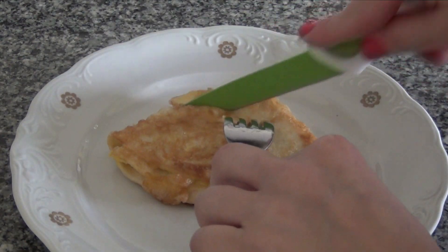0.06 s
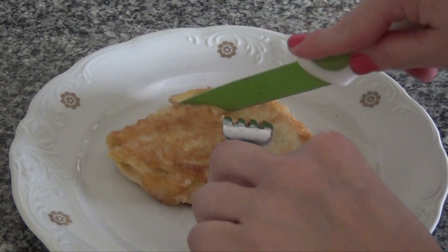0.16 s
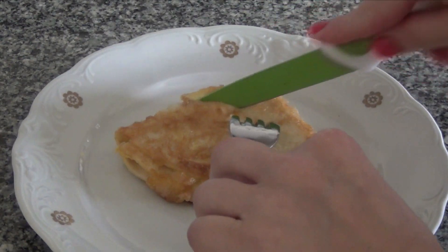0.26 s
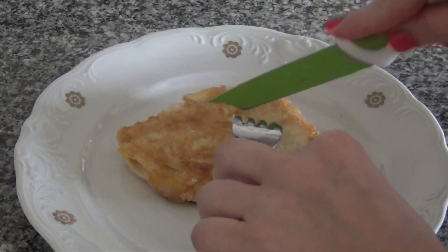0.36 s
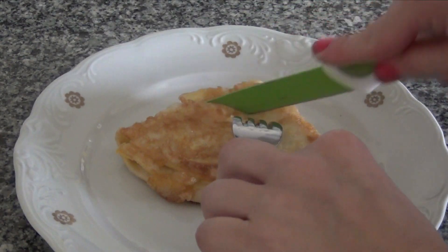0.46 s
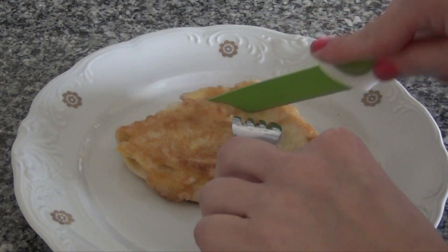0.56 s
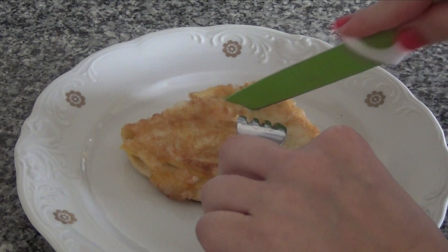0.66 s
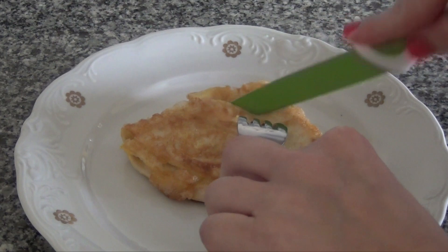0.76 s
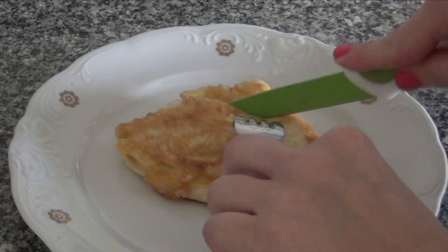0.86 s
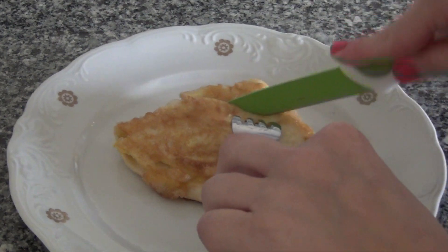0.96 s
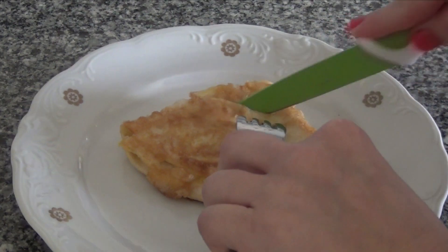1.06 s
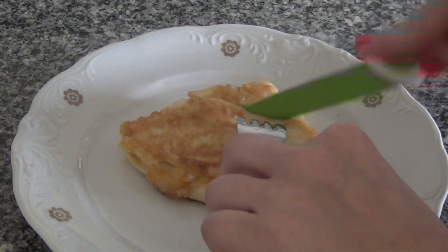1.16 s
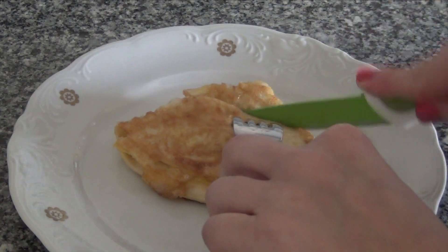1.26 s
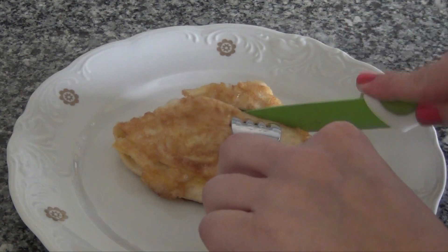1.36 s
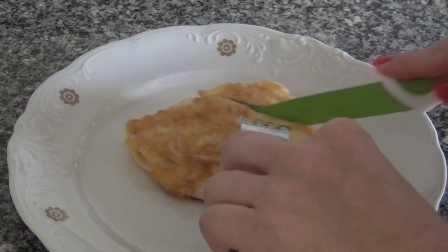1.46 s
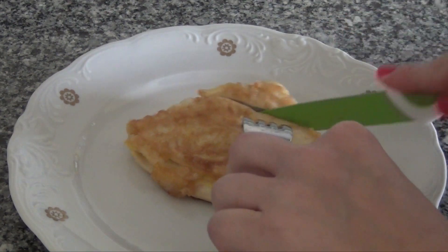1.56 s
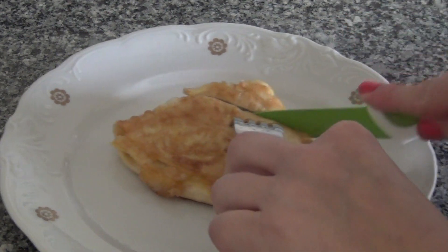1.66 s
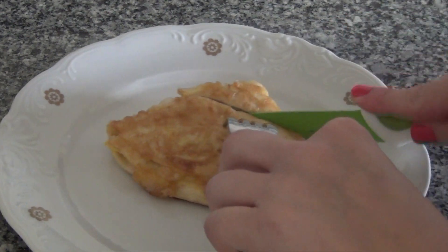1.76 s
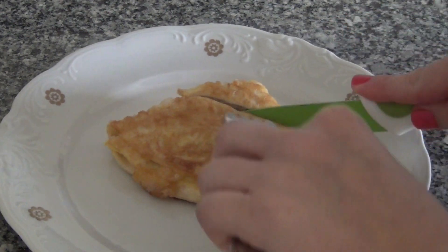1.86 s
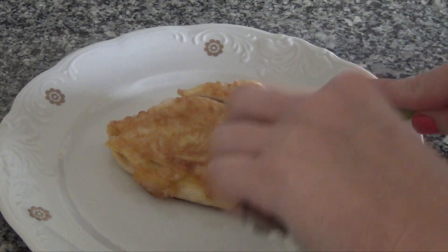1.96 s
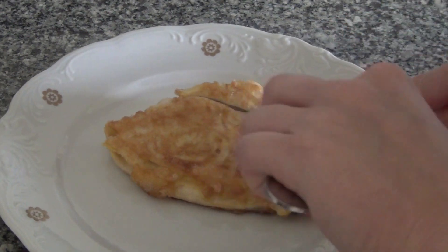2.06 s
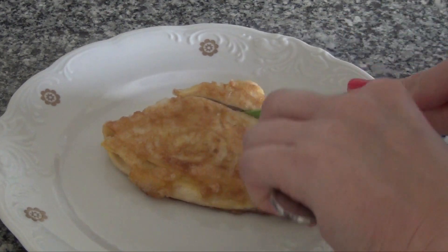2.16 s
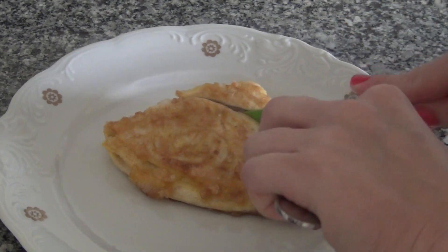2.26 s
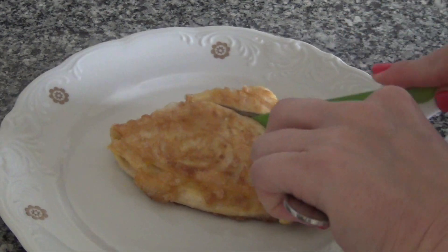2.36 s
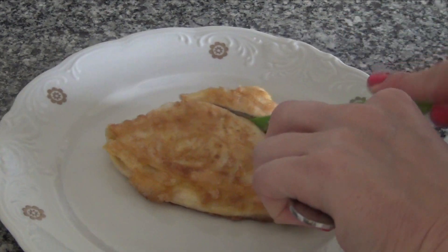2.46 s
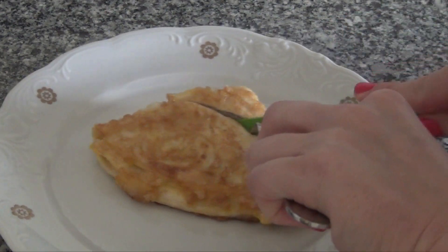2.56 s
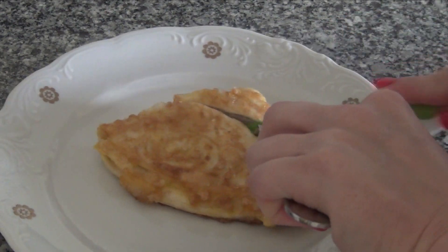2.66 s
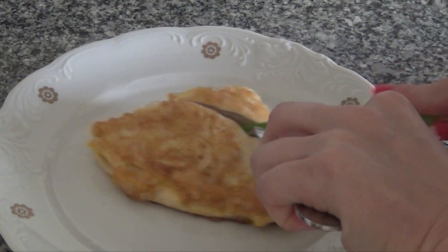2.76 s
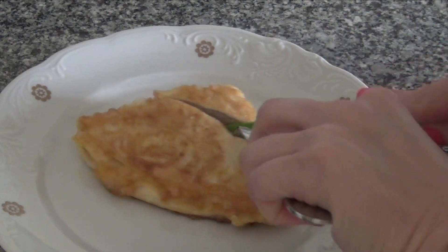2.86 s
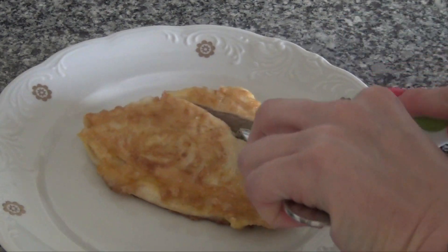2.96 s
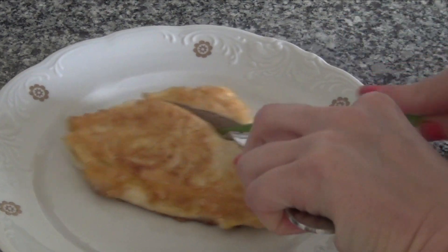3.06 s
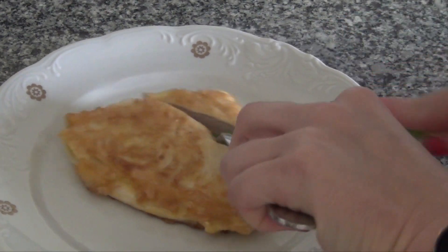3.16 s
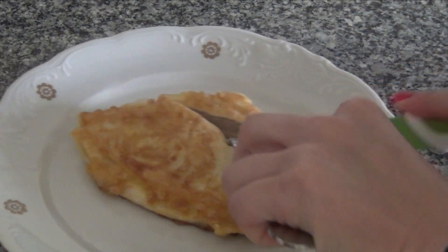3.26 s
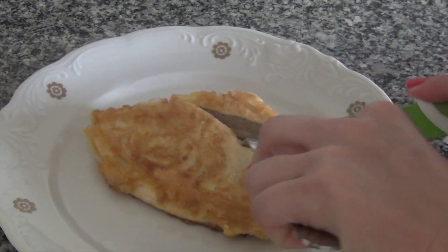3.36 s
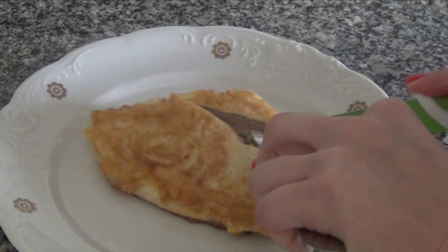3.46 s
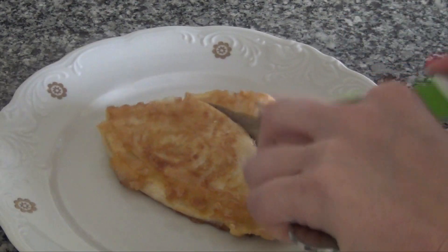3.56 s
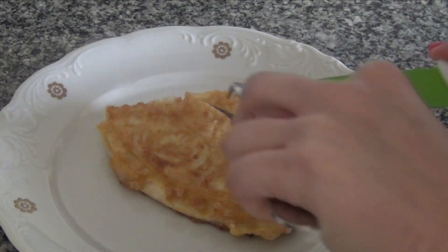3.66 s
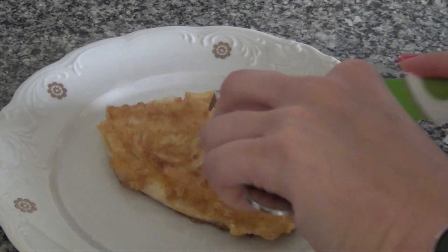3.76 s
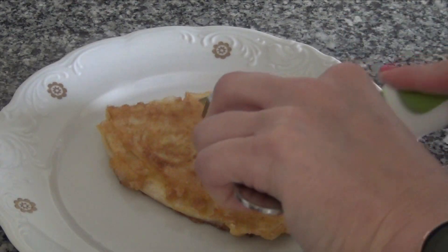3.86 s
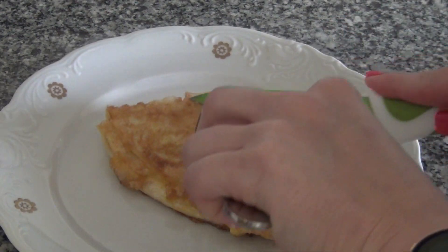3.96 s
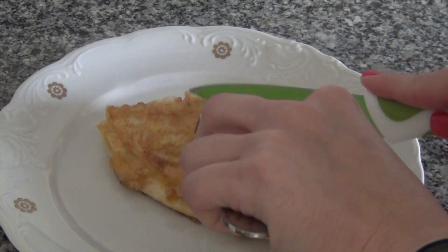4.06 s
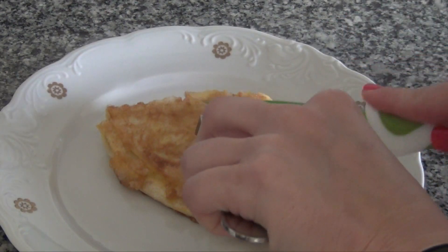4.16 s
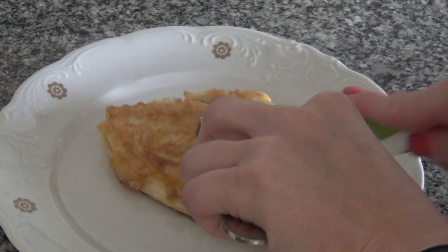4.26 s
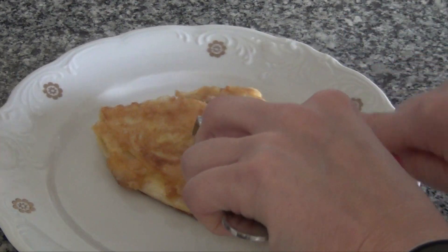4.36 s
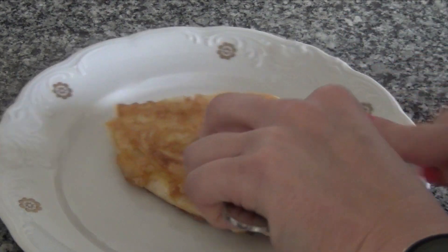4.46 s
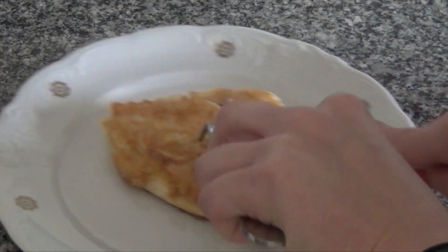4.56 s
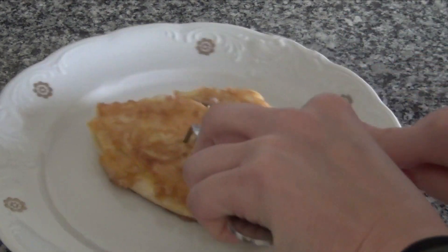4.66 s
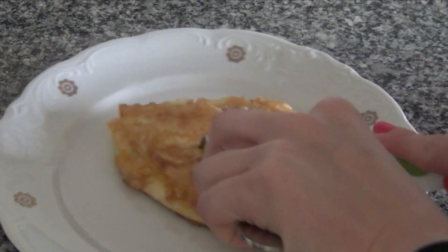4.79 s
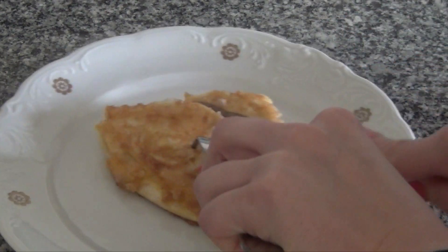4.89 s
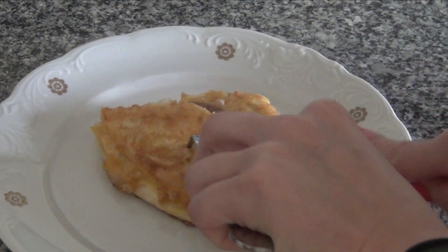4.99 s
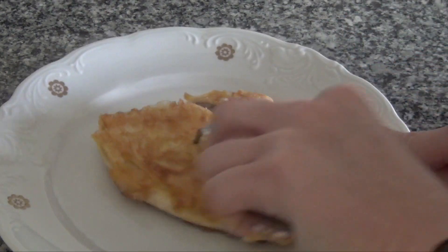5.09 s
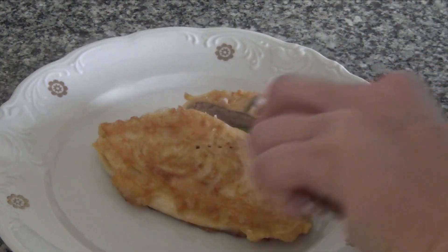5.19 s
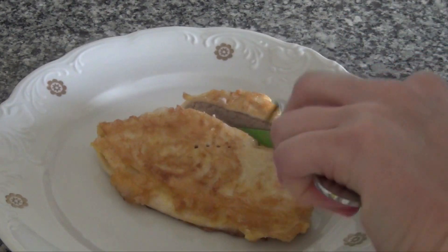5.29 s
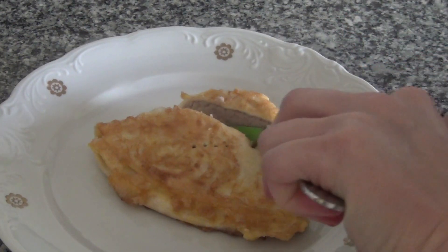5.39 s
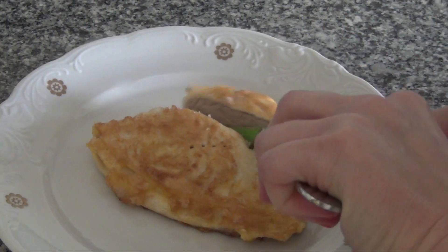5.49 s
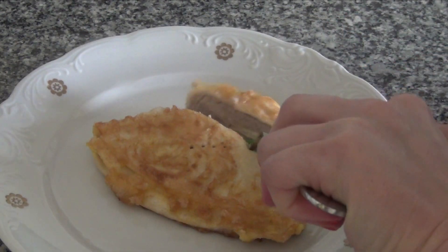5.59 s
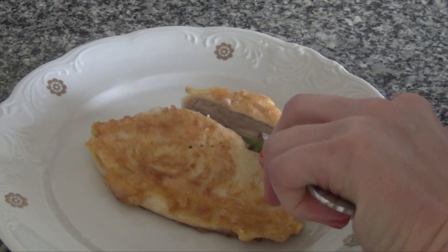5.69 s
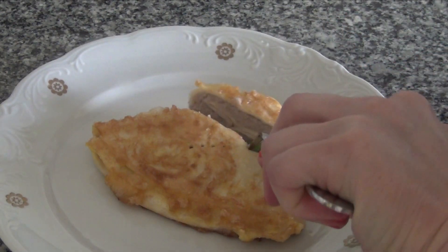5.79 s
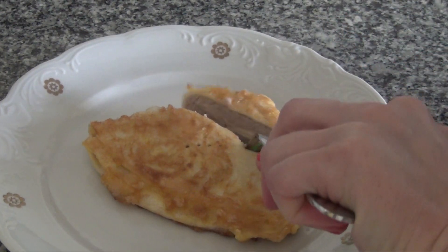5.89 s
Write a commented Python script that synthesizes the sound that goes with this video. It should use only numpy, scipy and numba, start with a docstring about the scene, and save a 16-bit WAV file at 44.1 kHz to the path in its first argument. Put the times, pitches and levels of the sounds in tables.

```python
"""Cutting fried food on a plate

A knife saws through fried food on a porcelain plate, held by a fork, close to a small camera.
Blows and scrapes ring the plate's modes (its own pitches); it also chatters and booms on a stone worktop.
The crust cracks in short noise clicks; delay lines make a hard kitchen ring after it.
Shaped noise, wavering hum and two steady tones lie underneath."""
import sys
import numpy as np
from scipy import signal
from scipy.fft import rfft, irfft
from scipy.io import wavfile
from scipy.ndimage import uniform_filter1d
from numba import njit

SR = 44100
rng = np.random.default_rng(int(sys.argv[2]) if len(sys.argv) > 2 else 0)


def to_wav(sig):
    """Store sig (one row per channel, or 1-D mono) as 16-bit WAV at the path in sys.argv[1].

    Samples outside -1..1 are clipped; the rate is SR.
    """
    pcm = np.clip(np.atleast_2d(sig), -1, 1) * 32767
    pcm = np.round(pcm).astype(np.int16)
    wavfile.write(sys.argv[1], SR, pcm.T)  # frames by channels


N = 261634  # length in samples

# shape of the kitchen noise: (frequency [Hz], relative level per Hz [dB])
KITCHEN_SPECTRUM = [(28, -60), (42, -39), (75, -30), (130, -17.5), (180, -10), (330, -12.5), (480, -12),
                    (530, -12.5), (850, -9), (1400, -16.5), (3500, -21), (6000, -25.5), (11000, -26.5),
                    (15700, -27)]
# wavering hum of an appliance: (frequency [Hz], width [Hz], rms level [dB])
HUM_LINES = [(223.3, 4, -60.5), (432.4, 31, -60), (453, 23, -56)]
# steady mains hum and an electronic whine: (frequency [Hz], rms level [dB])
STEADY_TONES = [(100, -68.5), (15625, -75)]
KITCHEN_NOISE_DB, KITCHEN_TOP_HZ = -53, 15750

# cutlery dragging over the glaze, one row a push, levels before each group's own share:
# (strongest moment [s], length [s], low and body level [dB], treble level [dB])
SCRAPE_PUSHES = [(0.089, 0.055, -40, -43.5), (0.45, 0.071, -42, -48), (0.652, 0.088, -49.5, -55),
                 (1.054, 0.069, -42.5, -52), (1.305, .03, -42, -53), (1.362, .08, -37, -70),
                 (1.49, 0.16, -53.5, -61.5), (1.68, 0.065, -35, -48.5), (1.77, 0.03, -44, -64),
                 (1.837, 0.089, -40, -60), (2.15, 0.068, -51, -54.5), (2.298, 0.026, -52, -56),
                 (2.366, 0.096, -49.5, -55.5), (2.507, 0.036, -49.5, -59), (2.572, 0.1, -45, -53.5),
                 (2.68, 0.041, -45, -41.5), (2.82, 0.31, -43.5, -52.5), (2.962, 0.083, -39, -41.5),
                 (3.079, 0.089, -34, -43), (3.218, 0.092, -36, -41.5), (3.328, 0.13, -40, -50.5),
                 (4.035, 0.031, -61, -53), (4.175, 0.028, -73, -64), (4.35, 0.052, -60, -57.5),
                 (4.5, 0.11, -40, -48), (4.617, 0.098, -40, -40.5), (4.766, 0.17, -43.5, -46),
                 (5.044, 0.028, -34, -34.5), (5.125, 0.056, -38, -53), (5.48, 0.19, -51, -55),
                 (5.584, 0.072, -46.5, -50), (5.651, 0.022, -58, -50), (5.787, 0.078, -37, -38),
                 (5.894, 0.057, -48, -56)]
# how a scrape's treble is shared out: group name -> level [dB]
SCRAPE_TREBLE_DB = dict(ping=-1.5, clink=-0.5, sheen=-3.5)
# a push swells by this much to its strongest moment; share of its length spent rising
SWELL_DB, RISE_SHARE = 10, 0.49
GRIT_DB = -7  # share of the grit heard as plain rasp

# blows on the plate, the last three relative to the body:
# (time [s], body level [dB], low modes [dB], ping modes [dB], brightness [dB])
PLATE_BLOWS = [(0.0547, -18.5, -3, -14.5, -15), (0.0656, -17.5, -13.5, -17, -16),
               (0.1239, -13.5, -12, -1, -7), (0.42, -24, -5, -37, -24), (0.4484, -29, 0, -23, -16),
               (0.478, -14, -13, -0.5, -3.5), (0.7976, -22.5, -7.5, -18, -22),
               (0.827, -14.5, -10.5, -13, -16.5), (0.8427, -14.5, -7, -16, -13),
               (0.8515, -8, -30, -9.5, -11.5), (0.8634, -20, -9.5, -14, -18), (0.8984, -22.5, -10, -9, -27),
               (1.1838, -18.5, -7.5, -24, -22.5), (1.2129, -13, -20, -18, -20),
               (1.2301, -9.5, -12.5, -13.5, -14), (1.2437, -20, 3, -27, -13), (1.2548, -18, -7, -13, -20),
               (1.5923, -39.5, -6, 2, 4), (1.5999, -31.5, -24, -3, 2), (1.6161, -17, -16.5, -5, -5.5),
               (1.6371, -23.5, -5.5, -32, -23), (1.6671, -27.5, -2, -23, -18), (1.7538, -34, -6, -5, 3),
               (1.8094, -21, -2.5, -35, -29), (2.118, -41, -18, -7, 9), (2.2927, -40, -14, -23, -6),
               (2.3368, -38, -12, -10, -9), (2.643, -50, -22, 4, 8), (2.6538, -35, -23, 7.5, 13),
               (2.7684, -33, -22, -8, -10), (3.0159, -33.5, -26, -4, 3.5), (3.1937, -27, -39, -10, -23),
               (3.209, -31, -32, -2, -9), (4.0293, -48, -11, 1, 2), (4.363, -10, -19, -17, -15),
               (4.368, -15, -7.5, -11, -12), (4.3794, -9, -17, -20, -16.5),
               (4.3925, -13.5, -8.5, -9.5, -19.5), (4.5455, -20, -8, -21, -16.5),
               (4.5587, -13, -10, -25, -20), (4.572, -11.5, -8, -23.5, -20.5), (4.6527, -26, -7, -35, -14),
               (4.735, -32, -25, -11, -3), (4.7572, -28, -22, -7, -4), (4.8586, -29, -23, -8, 0),
               (4.8677, -13.5, -14, -12, -5), (4.876, -13, -12.5, -14, -19),
               (4.8861, -12.5, -5.5, -27, -27), (5.022, -22, -9.5, -9, -9), (5.0363, -26, -6, -12, -2),
               (5.0576, -11.5, -8, -22, -20), (5.1647, -11.5, -11.5, -30, -17.5),
               (5.1708, -8.5, -11, -16, -18), (5.3419, -33.5, -7.5, 2, 11.5), (5.5504, -36, -7, -11, -13),
               (5.6606, -33, -3.5, 5.5, 5), (5.7786, -33, -32, -15, -1), (5.8875, -35.5, -11, -25, -7.5)]
# how brightness lifts the upper groups: (level at brightness 0 [dB], slope [dB per dB])
BRIGHTNESS_LIFT = dict(clink=(-1.8, 0.82), sheen=(2.25, 1.25))
# plate modes in each group: (frequency [Hz], width [Hz], energy within the group [dB])
PLATE_MODES = dict( low=[(420, 70, -2), (490, 30, -3), (618, 18, 1), (731, 14, 0)], body=[(1148, 18, -8),
               (1343, 25, -2), (1390, 22, -1), (1490, 28, 1), (1585, 70, -2), (1755, 45, -2),
               (1890, 40, -3), (2009, 28, -7), (2357, 4, -15)], ping=[(2925, 50, -1), (3082, 14, -2),
               (3260, 140, -5)], clink=[(3930, 40, -10), (4440, 80, 0), (4880, 80, 0), (5600, 110, -1),
               (5950, 70, -3), (6260, 70, -5)], sheen=[(7200, 60, -5), (7860, 110, -2), (9250, 110, -5),
               (9480, 110, -2), (10800, 220, 0), (11500, 250, -2), (12100, 200, 0), (14100, 200, -6)])
# what each group gives off:
# (low edge [Hz], high edge [Hz], ring [dB], scrape [dB], scrape tilt [dB per octave])
MODE_GROUPS = dict(low=(309, 833, -2.5, -21, -13), body=(1013, 2331, -4, -7.5, 30.5),
               ping=(2515, 3593, -1, -5.5, 29), clink=(3709, 6700, -1.5, -6, -9.5),
               sheen=(6905, 14500, -2.5, -1, 2))
# noise of the blow's contact in each group: (level [dB], decay [s])
CONTACT_NOISE = dict(low=(-15, .015), body=(-14, .009), ping=(-16, .006), clink=(-15, .008),
                 sheen=(-14, .007))
# rattle after each blow, before the scrape share: (level relative to the blow [dB], time to fall 60 dB [s])
CHATTER_TAILS = dict(low=(-10, 0.5), body=(-14, 0.26), ping=(-19.5, 0.38), clink=(-15, 0.24),
                 sheen=(-17, .12))
# soft, late boom of the worktop under the plate
BOOM_HZ, BOOM_WIDTH_HZ, BOOM_DB, BOOM_RISE_S, BOOM_FALL_S = 208, 88, -6.5, 0.015, 0.038

# crust cracking under the blade: (time [s], peak level [dB], centre frequency [Hz])
CRUST_TICKS = [(0.1082, -30, 11500), (0.2126, -31.5, 10900), (0.405, -37, 9700), (0.645, -38, 9100),
               (1.1767, -47, 11300), (1.1935, -31, 9550), (1.3024, -22.5, 10000), (1.4905, -35, 11600),
               (1.6464, -43, 7330), (1.8587, -35, 9100), (2.208, -29.5, 12300), (2.2163, -32, 12700),
               (2.299, -36, 9250), (2.3104, -35, 9790), (2.358, -34, 12400), (2.3694, -35, 10700),
               (2.577, -39, 9580), (2.7114, -33, 7810), (2.7611, -42, 10600), (2.789, -32, 11100),
               (3.4144, -51, 9230), (3.4635, -46, 8100), (3.5624, -34.5, 8100), (3.5706, -31, 11500),
               (4.0347, -30.5, 10600), (4.1684, -35, 10100), (4.251, -40, 12100), (4.305, -34, 11600),
               (4.4725, -31.5, 8530), (4.4842, -35, 12000), (4.705, -37, 11000), (5.0963, -34, 11100),
               (5.143, -32, 9100), (5.1576, -41, 9600), (5.509, -34, 9160), (5.6022, -33, 9210),
               (5.6476, -42, 11400)]

CAMERA_TOP_HZ = 16500


def undb(db):
    """Turn decibels into a gain."""
    return 10 ** (np.asarray(db) / 20)


def level(x, db):
    """Scale a sound to an rms level."""
    return x * undb(db) / np.sqrt(np.mean(x ** 2))


def band(x, hz, width_hz):
    """Keep a band around one frequency with a two-pole filter."""
    return signal.lfilter(*signal.iirpeak(hz, hz / width_hz, fs=SR), x)


def ring(x, hz, width_hz):
    """Ring one mode: an impulse of 1 leaves a sine that dies away from amplitude 1."""
    radius = np.exp(-np.pi * width_hz / SR)
    angle = 2 * np.pi * hz / SR
    return signal.lfilter([0, radius * np.sin(angle)], [1, -2 * radius * np.cos(angle), radius ** 2], x)


def spikes(times, sizes):
    """Place impulses at the given moments."""
    return np.bincount(np.minimum((times * SR).astype(int), N - 1), sizes, N)


def walk(rate):
    """Glide between random levels, `rate` of them a second, with a spread near 1."""
    hold = int(SR / rate)
    steps = np.repeat(rng.standard_normal(N // hold + 1), hold)
    return 0.86 * uniform_filter1d(steps, hold)[:N]


def kitchen():
    """Shaped noise drifts in level under hum and tones, nearly alike in both channels."""
    hz, db = np.transpose(KITCHEN_SPECTRUM)
    f = np.maximum(np.fft.rfftfreq(N, 1 / SR), 1)
    shape = undb(np.interp(np.log(f), np.log(hz), db)) * (f < KITCHEN_TOP_HZ)
    mid, wide = (irfft(rfft(rng.standard_normal(N)) * shape, N) for _ in range(2))
    side = band(wide, 1550, 4700) * undb(-6.5)
    side += band(wide, 60, 120) * undb(-17)
    side += band(wide, 13000, 9900) * undb(-36)
    noise = level(mid + side * np.array([[1], [-1]]), KITCHEN_NOISE_DB) * undb(1.37 * walk(3.82))
    # narrow noise wavers; a sine holds steady
    hum = sum(level(ring(rng.standard_normal(N), f0, width), rms_db) for f0, width, rms_db in HUM_LINES)
    t = np.arange(N) / SR
    hum += sum(level(np.sin(2 * np.pi * f0 * t), rms_db) for f0, rms_db in STEADY_TONES)
    return noise + hum


def strokes(column):
    """Power of the scrapes: each push swells to its strongest moment and sinks again."""
    out, t = np.zeros(N), np.arange(N) / SR
    for s, length, *db in SCRAPE_PUSHES:
        on = slice(max(int((s - 3 * length) * SR), 0), int((s + 3 * length) * SR))
        before = (s - t[on]) / RISE_SHARE
        after = (t[on] - s) / (1 - RISE_SHARE)
        away = np.maximum(before, after) / length
        out[on] += undb(db[column] - SWELL_DB * away ** 2) ** 2
    return out


def chatter(name, times, blow_db):
    """Power of the rattle that each blow leaves behind, dying away steadily in dB."""
    relative_db, t60 = CHATTER_TAILS[name]
    fall = np.exp(-2 * np.log(1000) / (t60 * SR))
    return signal.lfilter([1], [1, -fall], spikes(times, undb(blow_db + relative_db) ** 2))


def group(name, times, blow_db, scrape_power):
    """One group of plate modes: blows strike them and the grit of scrapes and chatter drives them."""
    hz, width, db = np.transpose(PLATE_MODES[name])
    low_hz, high_hz, ring_db, rub_db, tilt_db = MODE_GROUPS[name]
    contact_db, contact_s = CONTACT_NOISE[name]

    # each blow lands on a new spot, so it shares its force out differently
    luck_db = 6.3 * rng.standard_normal((len(times), len(hz)))
    sign = np.sign(rng.standard_normal(luck_db.shape))
    # a wide mode dies sooner, so it starts louder for the same energy
    shares = undb(db) * np.sqrt(width) * undb(luck_db) * sign
    shares *= undb(blow_db + ring_db)[:, None] / np.sqrt(np.sum(shares ** 2, axis=1, keepdims=True))

    # stick-slip grit: dense grains of very uneven size, patchy over time
    grain_db = 2.73 * rng.exponential(size=N) + 2.4 * walk(70)
    grit = level(rng.standard_normal(N) * undb(grain_db), 0)
    grit *= undb(rub_db) * np.sqrt(scrape_power + chatter(name, times, blow_db))

    # a dragging edge feeds the wide modes more than the narrow ones
    rub = undb(db + tilt_db * np.log2(hz / low_hz)) * width ** 0.26
    drive = rub * np.sqrt(width * 4 * np.pi / SR / np.sum(rub ** 2))
    rings = np.zeros(N)
    for k in range(len(hz)):
        # the edge wanders over the plate, so each mode swells and fades on its own
        rubbing = drive[k] * undb(5.53 * walk(12)) * grit
        rings += ring(spikes(times, shares[:, k]) + rubbing, hz[k], width[k])

    # the contact itself: a burst of noise that dies within milliseconds
    fall = np.exp(-1 / (contact_s * SR))
    burst = signal.lfilter([1], [1, -fall], spikes(times, undb(blow_db + contact_db)))
    noise = burst * rng.standard_normal(N) + undb(GRIT_DB) * grit
    noise *= np.sqrt(SR / 2 / (high_hz - low_hz))  # make up for what the band filter removes
    edges = signal.butter(3, [low_hz, high_hz], "band", fs=SR, output="sos")
    return signal.sosfilt(edges, rings + noise)


def worktop(times, blow_db):
    """A dull boom of low noise that builds up after each blow and dies away."""
    swell = spikes(times, undb(blow_db + BOOM_DB) ** 2)
    for tau in (BOOM_RISE_S, BOOM_FALL_S):
        swell = signal.lfilter([1], [1, -np.exp(-1 / (tau * SR))], swell)
    noise = np.sqrt(swell / (BOOM_RISE_S * SR)) * rng.standard_normal(N)
    return band(band(noise, BOOM_HZ, BOOM_WIDTH_HZ), BOOM_HZ, BOOM_WIDTH_HZ)


def plate():
    """Five groups of modes ring under blows, chatter and scrapes, and the worktop booms below."""
    s, db, low, ping, bright = np.transpose(PLATE_BLOWS)
    above_db = dict(ping=ping)
    for name, (at_db, slope) in BRIGHTNESS_LIFT.items():
        above_db[name] = at_db + slope * bright
    body_rub, treble_rub = strokes(column=0), strokes(column=1)
    out = group("low", s, db + low, body_rub) + group("body", s, db, body_rub)
    for name in above_db:
        out += group(name, s, db + above_db[name], treble_rub * undb(SCRAPE_TREBLE_DB[name]) ** 2)
    return out + worktop(s, db + low)


def crust():
    """Each crack is a wide, bright noise click about a millisecond long."""
    out, t = np.zeros(N), np.arange(400) / SR
    for s, db, hz in CRUST_TICKS:
        burst = rng.standard_normal(len(t)) * np.exp(-t / 0.0015)
        click = band(band(burst, hz, 6900), hz, 7600)
        i = int(s * SR)
        out[i:i + len(t)] += click * undb(db) / np.abs(click).max()
    return out


def scatter(x):
    """Allpass filters smear a click in time, as cupboards and crockery do."""
    for lag in (41, 67, 113, 197):  # samples
        a = np.zeros(lag + 1)
        a[0], a[-1] = 1, -.6
        x = signal.lfilter(a[::-1], a, x)
    return x


@njit
def walls(x, lags, gain, damp):
    """Echoes between hard walls: eight delay lines feed each other, duller on every round."""
    line, soft, out = np.zeros((8, 4096)), np.zeros(8), np.zeros((2, len(x)))
    for i in range(len(x)):
        total = 0.
        for k in range(8):
            echo = gain[k] * line[k, (i - lags[k]) & 4095]
            soft[k] += (1 - damp) * (echo - soft[k])
            total += soft[k]
            out[k % 2, i] += soft[k]
        for k in range(8):
            line[k, i & 4095] = x[i] + soft[k] - total / 4
    return out


def scene():
    """The plate sits a little to the left; the hard walls answer it over the kitchen noise."""
    near = plate() + crust()
    lags = np.array([487, 613, 797, 971, 1163, 1399, 1637, 1889])  # samples
    early = scatter(near)
    # each gain alone gives a 60 dB fall in 0.37 s; the tiny offset avoids slow near-zero numbers
    left, right = walls(early + 1e-18, lags, undb(-60 * lags / SR / 0.37), 0.26)
    mid = near + undb(-13) * early + undb(-15.5) * (left + right)
    # the middle of the range leans left; early echoes and walls add width
    side = 0.11 * band(mid, 1300, 1900) + undb(-22) * early
    side += undb(-29.0) * band(left - right, 3800, 3800) + undb(-30.5) * (left - right)
    return mid + side * np.array([[1], [-1]]) + kitchen()


def record(dry):
    """The camera cuts the top with a steep low-pass filter."""
    return signal.sosfilt(signal.ellip(10, .2, 80, CAMERA_TOP_HZ, fs=SR, output="sos"), dry)


dry = scene()
out = record(dry)
to_wav(out)
```